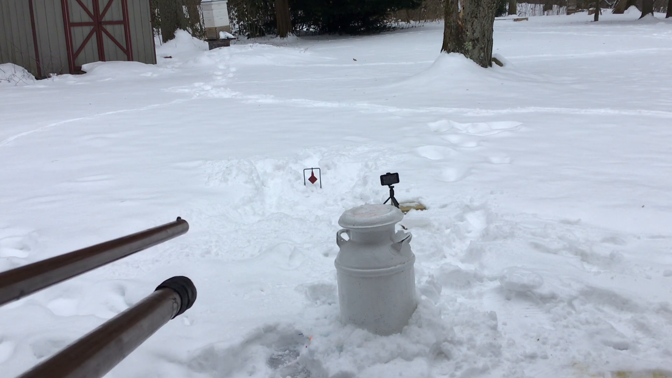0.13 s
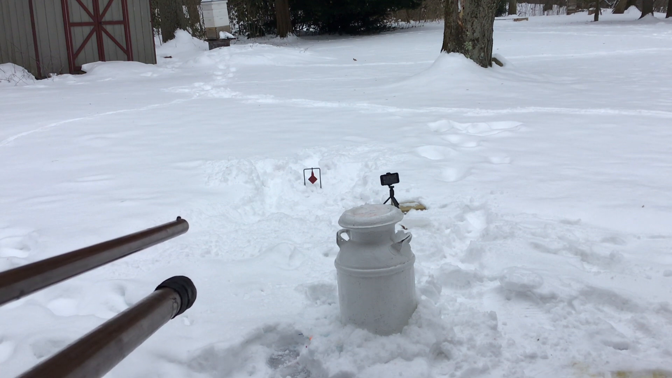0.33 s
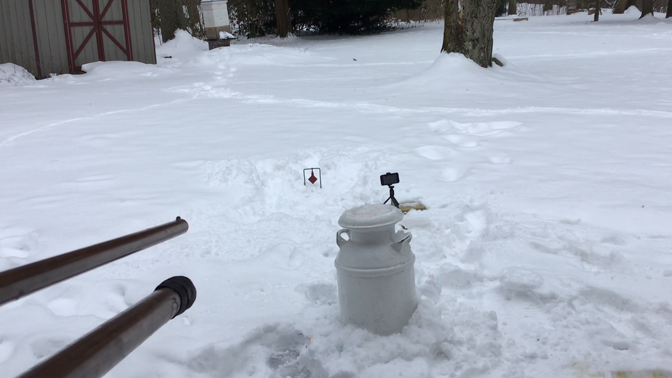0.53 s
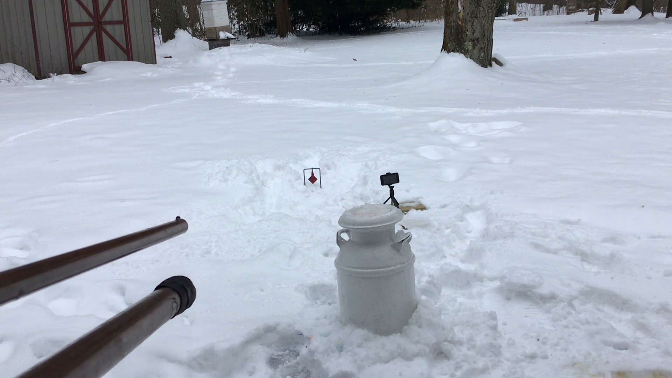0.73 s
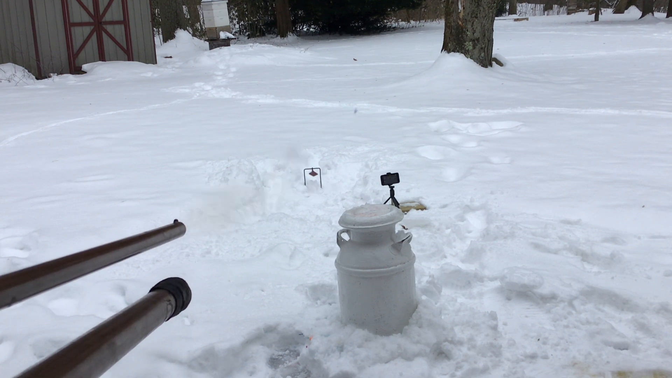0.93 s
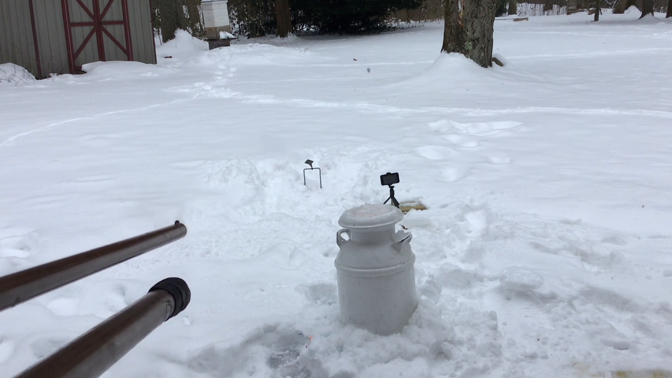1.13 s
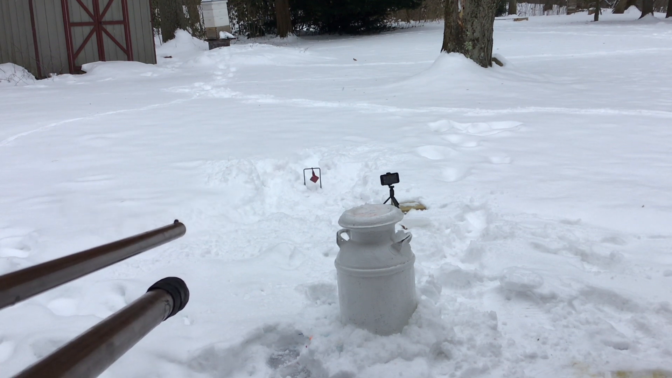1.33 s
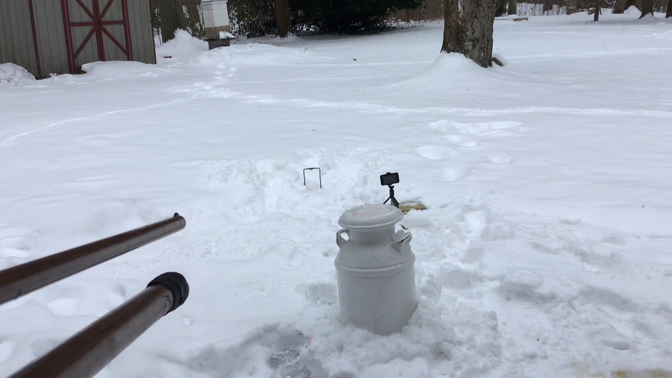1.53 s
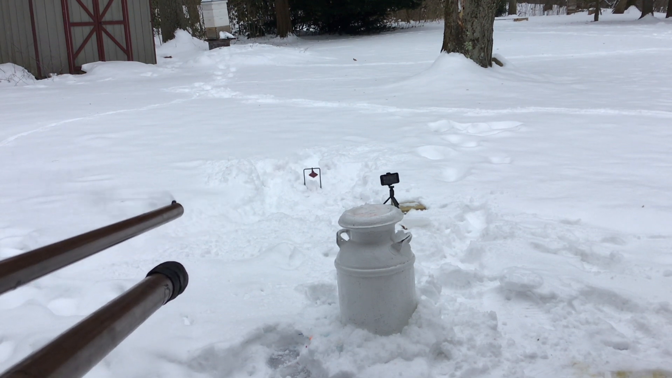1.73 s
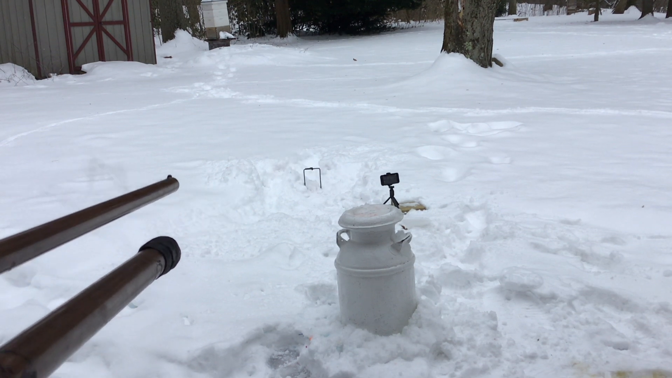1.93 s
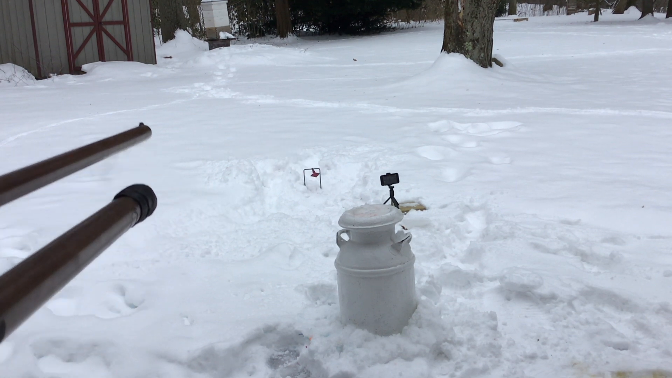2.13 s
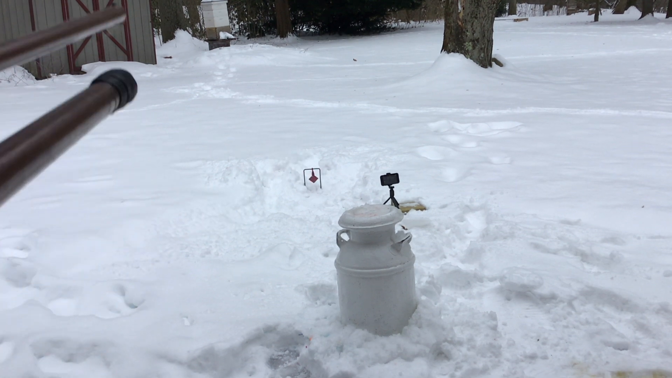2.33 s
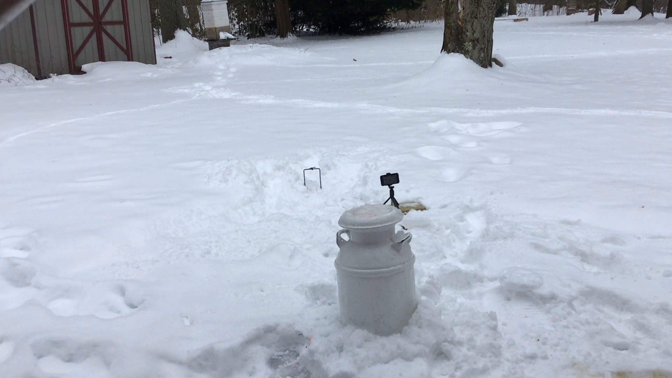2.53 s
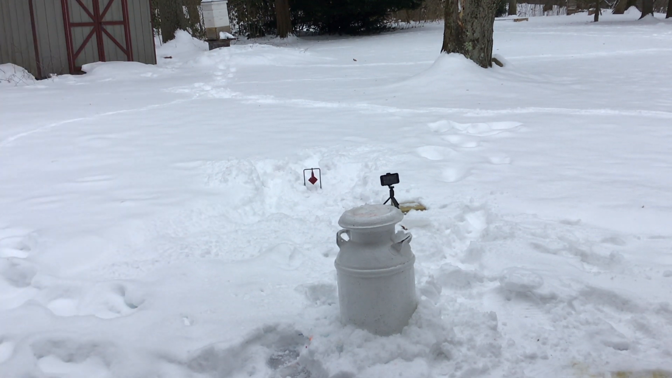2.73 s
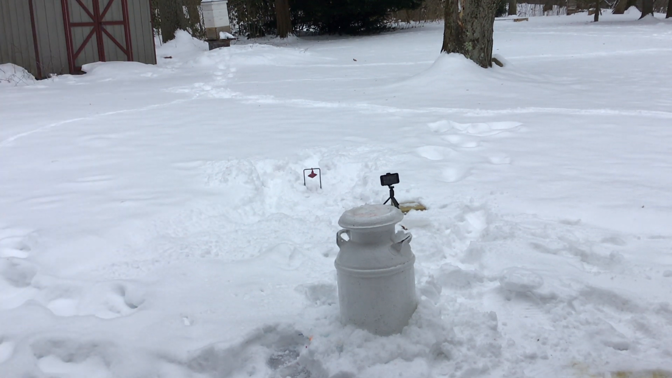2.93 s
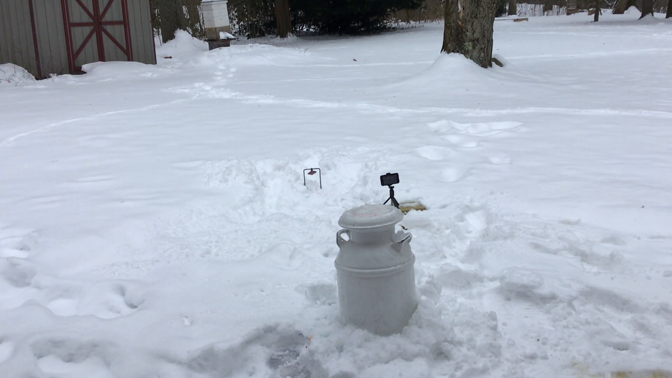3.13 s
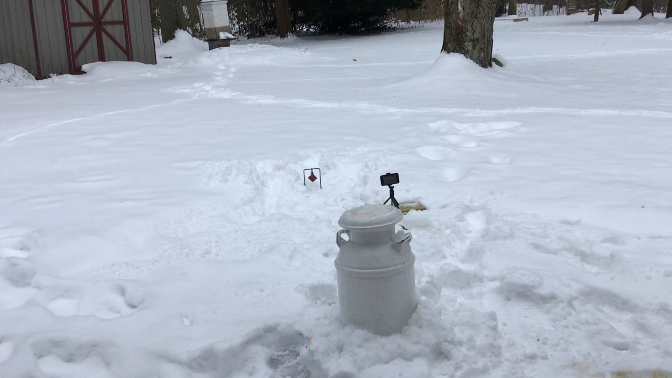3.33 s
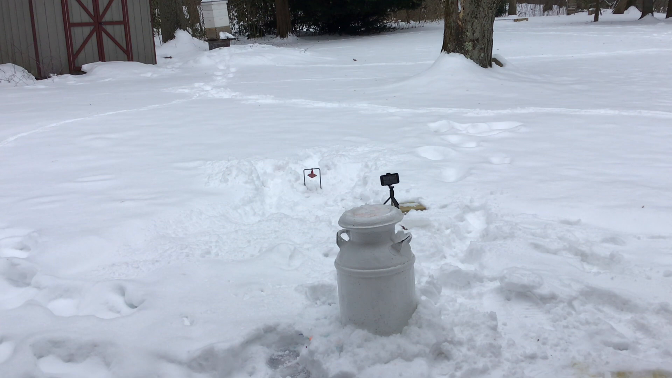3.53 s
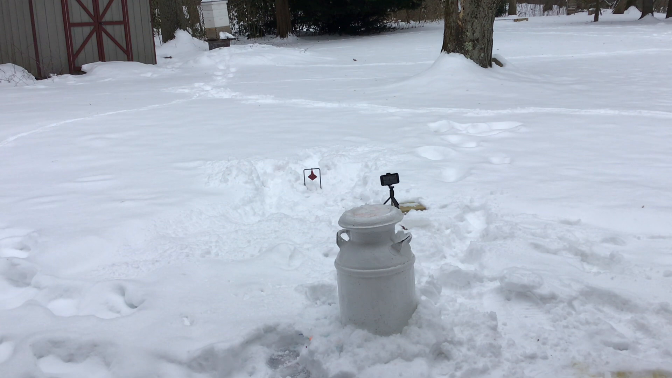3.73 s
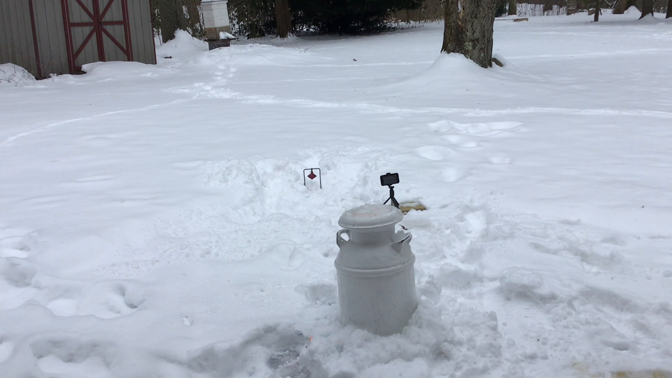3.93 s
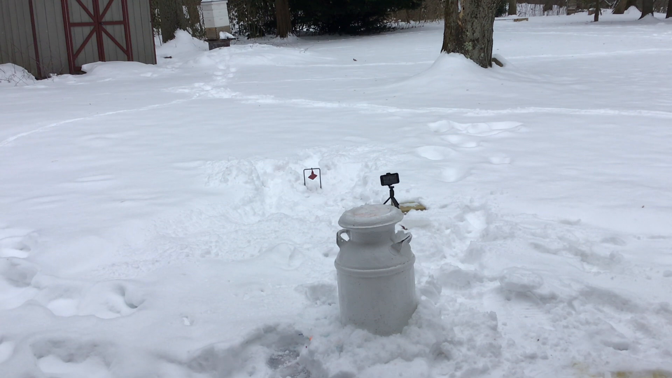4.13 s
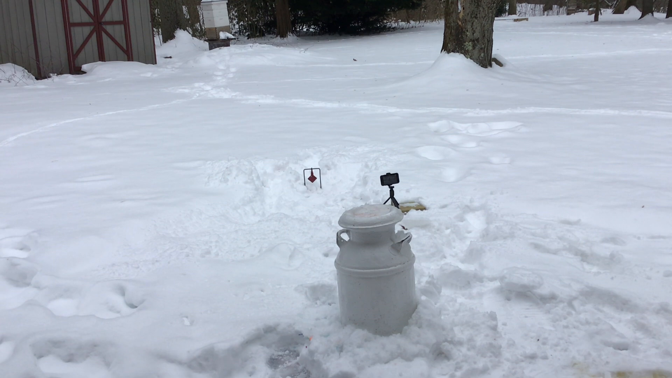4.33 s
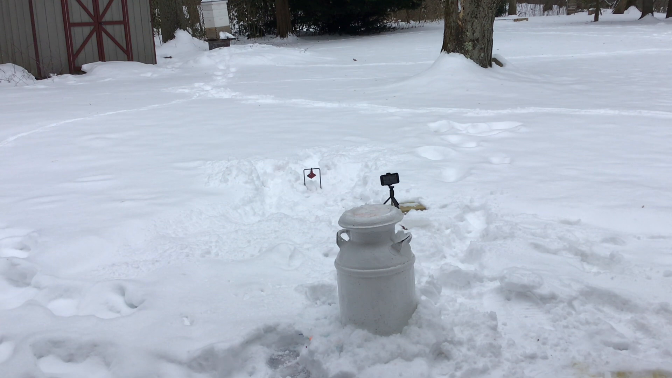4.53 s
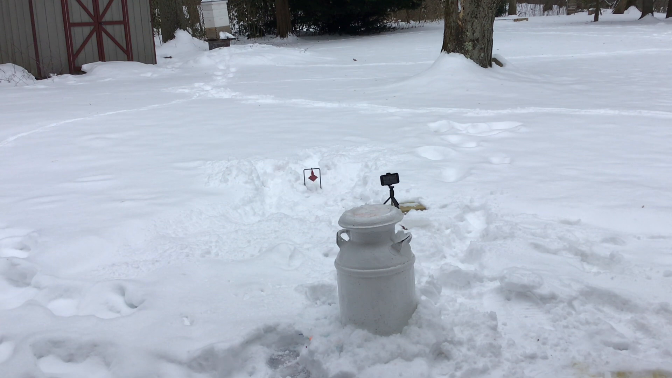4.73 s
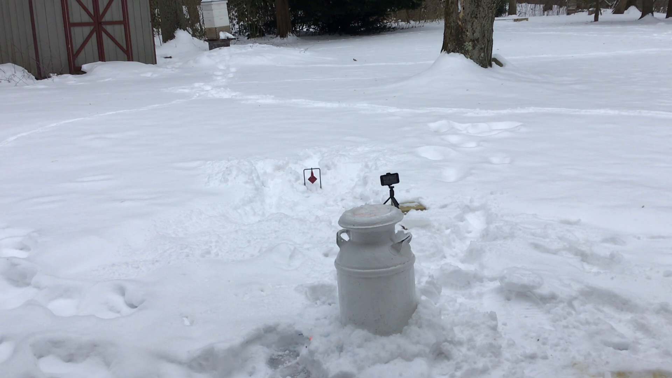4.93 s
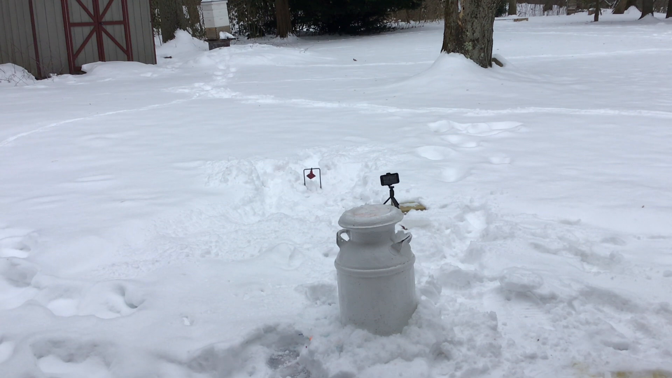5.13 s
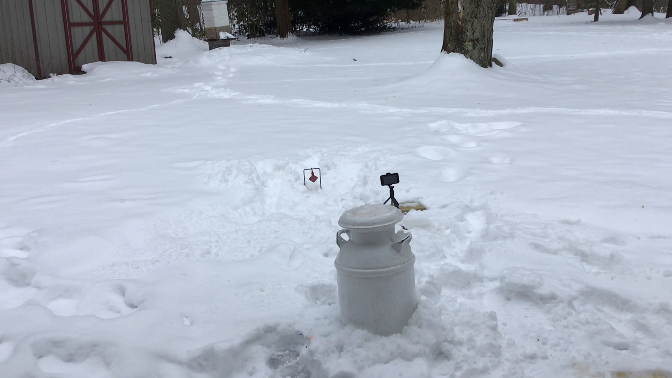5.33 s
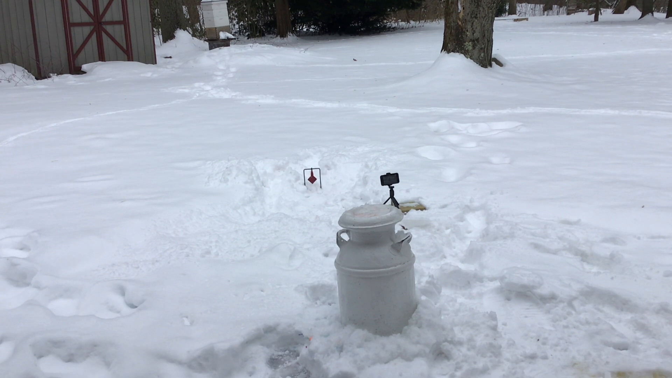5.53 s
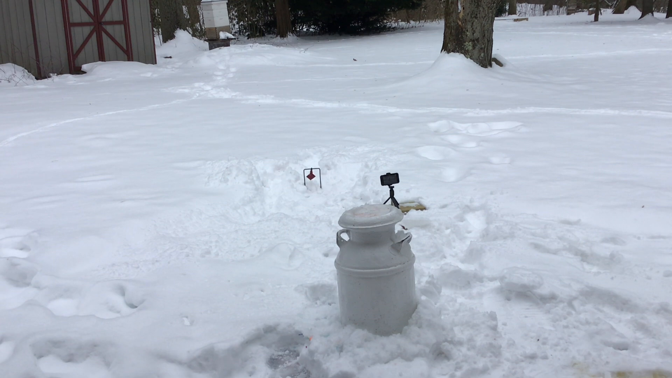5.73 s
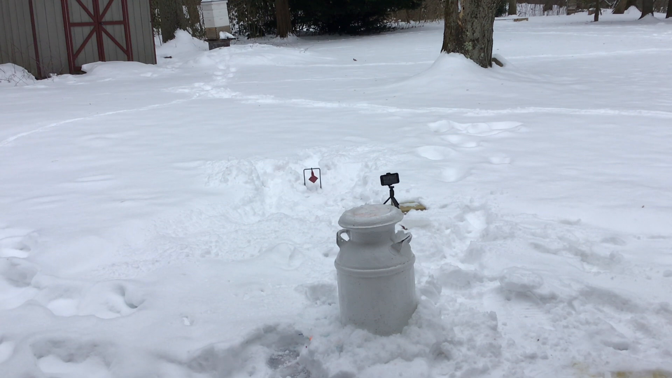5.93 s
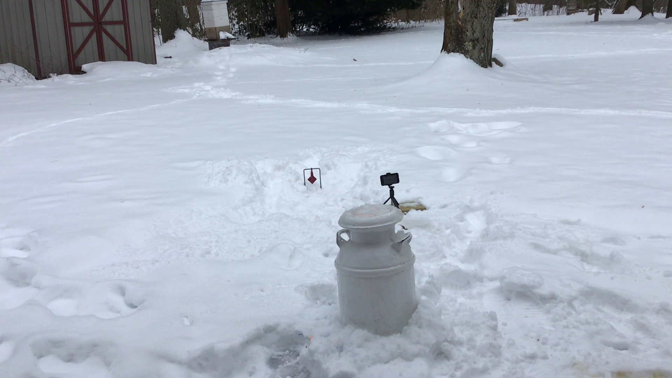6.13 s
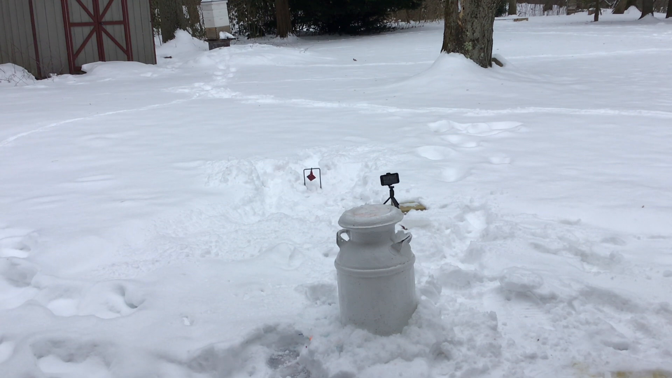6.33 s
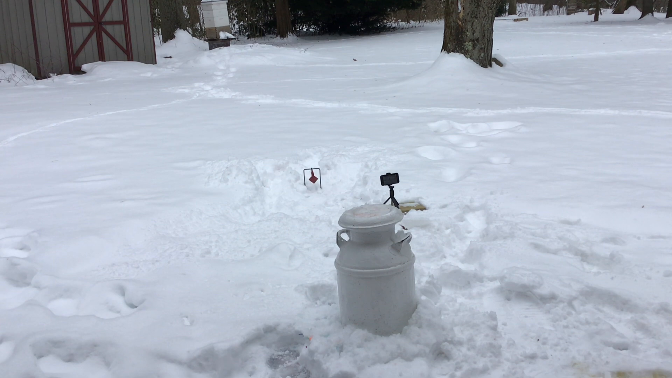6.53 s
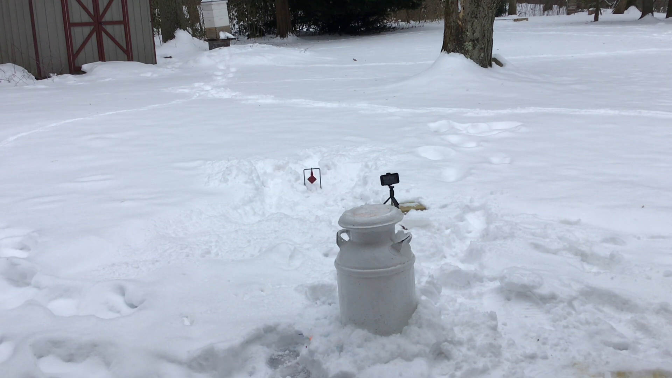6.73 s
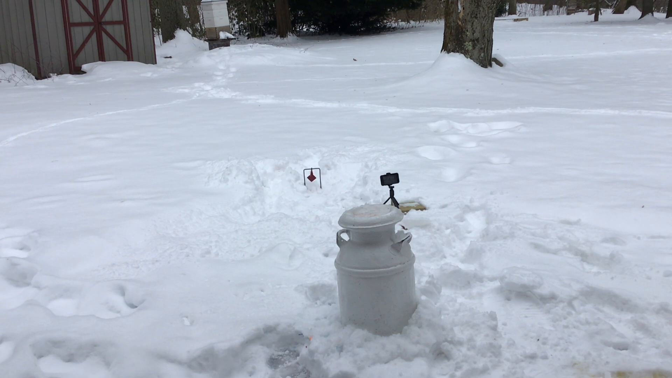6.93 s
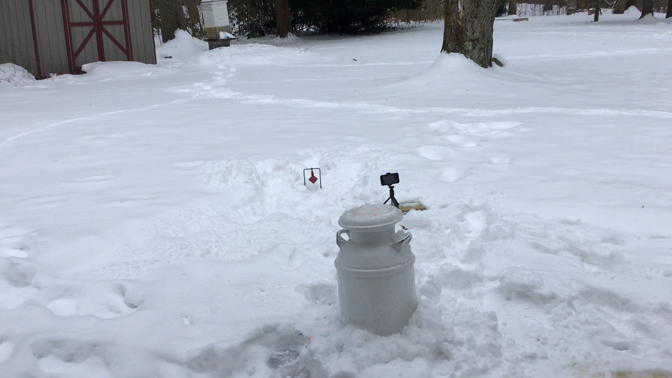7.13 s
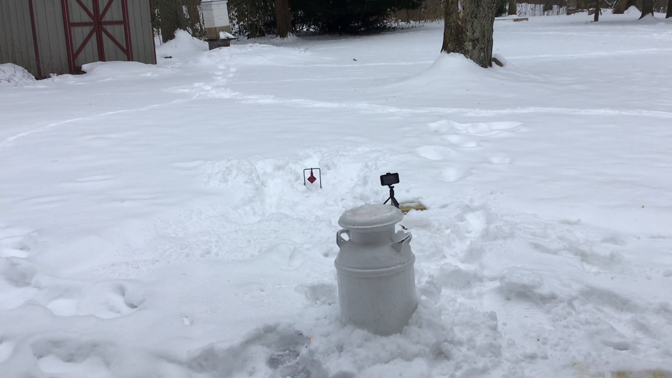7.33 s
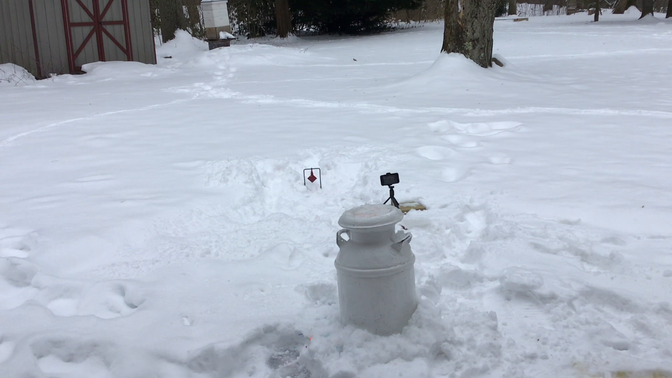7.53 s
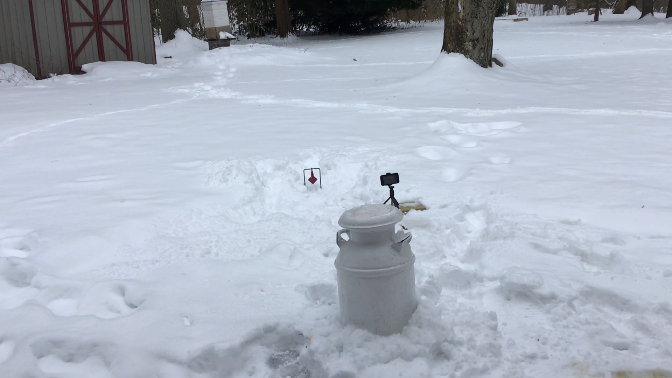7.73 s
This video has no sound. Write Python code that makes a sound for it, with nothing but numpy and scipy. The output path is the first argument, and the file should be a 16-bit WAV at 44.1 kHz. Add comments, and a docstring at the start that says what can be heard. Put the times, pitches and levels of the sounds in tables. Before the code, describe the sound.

A sudden close blast of air echoes outdoors with a faint metal ping, followed by a dull knock, sharp clicks and quiet birdsong.

```python
"""A snowy yard, phone microphone right beside a compressed-air launcher. Far traffic and wind on the
microphone run throughout; a small bird opens with faint, thin notes. The trigger clicks at 0.77 s, then
the valve lets go a short jet of air, a steel target rings, and walls, sheds and trees echo until 2.2 s.
From 1.6 s the launcher is handled close by, with clicks, knocks and a brushing sleeve, while birds in
the trees carry on with chips, buzzy notes and whistles."""
import sys
import numpy as np
from scipy import signal
from scipy.fft import rfft, irfft
from scipy.io import wavfile
from scipy.ndimage import uniform_filter1d

SR = 44100
rng = np.random.default_rng(int(sys.argv[2]) if len(sys.argv) > 2 else 0)


def wrap_up_sound(samples):
    """Save the sound to the file named by the first command line argument, as 16-bit audio."""
    columns = np.atleast_2d(samples).T
    # keep every value between -1 and 1, then stretch to whole-number steps
    tamed = np.clip(columns, -1, 1)
    steps = np.round(tamed * 32767).astype(np.int16)
    wavfile.write(sys.argv[1], SR, steps)


N = 342657

# air jet at the muzzle, beside the microphone: t/s, level/dB, tilt/(dB per octave)
JET_CURVE = [(.862, -58, -3.5), (.8735, -40.5, -3.5), (.875, -17, -1.5), (.882, -12, -2), (.894, -8, 1),
             (.917, -9.5, 1), (.937, -15, -1.5), (.945, -24, 0), (.96, -31, 2), (1.05, -46, -1),
             (1.2, -57.5, 0), (1.55, -91.5, -1)]
# its spectrum: f/Hz, density/dB
JET_SPECTRUM = [(24, -34), (40, -14), (70, -4.5), (320, -2), (479, -5), (556, -2.5), (790, -7),
                (1090, -7.5), (1180, -15), (1340, -8.5), (1590, -6), (6490, -9.5), (9220, -9.5),
                (16000, -14.5)]
# modes of valve and barrel: f/Hz, level/dB, t60/s
VALVE_MODES = [(65.6, -24, 0.2), (98, -20, 0.057), (130, -19, 0.08), (574, -19.5, 0.29), (1920, -13, .03),
               (2575, -11, .03), (3700, -10, 0.031), (7228, -13.5, 0.0042)]
# modes of the steel plate downrange: f/Hz, level/dB, t60/s
TARGET_MODES = [(5884, -2.5, 1.05), (6180, -13, .9), (6842, -13, .8), (7246, -8, .95), (7989, -10, .85),
                (8285, -1, .6), (9281, -11, .55), (10020, -11, .45)]
# echo off near walls, then sheds, then the tree line: t/s, level/dB, tilt/(dB per octave)
YARD_CURVE = [(.95, -33, 2), (1.0, -37, 3), (1.045, -48, 2.5), (1.08, -40, 2), (1.2, -45.5, 3.5),
              (1.23, -39.5, -0.5), (1.4, -43.5, -0.5), (1.75, -54, -3), (2.2, -71.5, 0)]
# its spectrum: f/Hz, density/dB
YARD_SPECTRUM = [(60, -26), (150, -23.5), (300, -1), (700, -0.5), (1800, -5.5), (3500, -11.5), (5500, -30),
                 (9000, -34.5), (16000, -51)]
# clearest slaps off walls and trunks: t/s, level/dB, f/Hz
WALL_SLAPS = [(0.956, -13, 680), (0.979, -14.5, 554), (1.077, -31, 2070), (1.097, -30, 1810),
              (1.101, -27.5, 600), (1.111, -26, 890), (1.131, -27, 2100), (1.217, -26, 446),
              (1.224, -26.5, 550), (1.241, -29, 503), (1.258, -30, 610), (1.284, -27.5, 708),
              (1.335, -29.5, 650), (1.38, -28.5, 1090), (1.467, -27.5, 670)]
# trigger and fittings, close: t/s, level/dB, f/Hz, second f/Hz, second level/dB, rattle level/dB
FITTING_CLICKS = [(0.7745, -46, 3200, 1800, -7, -9), (1.605, -57, 5000, 13030, 1, -4),
                  (1.636, -60.5, 11500, 12900, -1.5, -8), (2.2217, -51, 3000, 9000, -6, -6.5),
                  (2.3588, -52, 1400, 8200, -6, -0.5), (2.5215, -50, 2220, 4000, -10, -6.5),
                  (2.6102, -48.5, 2250, 4300, -5, -6), (2.658, -59, 2300, 4260, -4, -5),
                  (2.775, -59, 2390, 5000, -10, -8), (2.79, -61, 3970, 2500, -4, -8),
                  (3.022, -61.5, 4100, 2600, -9, -10), (5.349, -60, 2300, 4500, -8, -6),
                  (5.553, -29.5, 2750, 6640, -6.5, -14), (6.3098, -36, 2720, 7070, 0, -3.5),
                  (6.4817, -37.5, 1200, 6850, -9.5, -3.5), (6.528, -53, 2644, 6500, -14, -8),
                  (6.536, -55, 1470, 3970, -11, -3), (6.626, -54, 1360, 3980, -8, -2.5),
                  (7.6237, -57, 2240, 4300, -8, -10)]
# knocks on the launcher's pipe body: t/s, level/dB
BODY_KNOCKS = [(1.9369, -33), (1.9437, -42), (2.049, -54.5), (7.625, -54)]
# modes of that body: f/Hz, level/dB, t60/s
BODY_MODES = [(69.4, -10.5, 0.37), (131.4, -14, 0.19), (192, -3.5, 0.15), (293, 8.5, 0.054),
              (543, -1.5, 0.037), (785, 5.5, 0.017), (1490, -9, 0.025), (2520, -19, .012)]
# sleeve near the microphone: t/s, length/s, f/Hz, width/octaves, level/dB
SLEEVE_RUSTLES = [(1.8, 0.16, 7500, 0.18, -77), (1.738, 0.27, 12600, 0.52, -79.5),
                  (2.183, 0.16, 9000, 1, -79), (2.9, .07, 4870, 0.46, -80.5), (3.7, 0.35, 13600, 0.36, -84),
                  (6.92, .1, 13000, .3, -85.5), (7.2, .35, 13000, .2, -88)]
# runs of thin bird notes: t/s, held f/Hz, level/dB
THIN_NOTES = [(.045, 7940, -72), (.18, 7900, -77), (.32, 7800, -84), (.447, 7800, -84), (.58, 7700, -85),
              (5.938, 8250, -73), (6.078, 8050, -80), (6.22, 7980, -72), (6.345, 7850, -75),
              (6.475, 7700, -74), (6.61, 7800, -80), (6.87, 8100, -80), (7.22, 8400, -85)]
# arching notes: t/s, length/s, first f/Hz, held f/Hz, level/dB, upper f/Hz, upper level/dB
ARCHED_NOTES = [(3.395, 0.069, 7730, 8000, -77.5, 10000, -1), (3.518, .052, 6300, 7460, -71, 9300, -6),
                (5.426, 0.048, 6760, 8100, -75.5, 9500, -6), (5.523, 0.038, 5800, 7550, -69, 9300, -20),
                (7.33, .046, 6800, 7900, -80, 9700, -18), (7.418, .035, 6040, 7060, -78, 8900, -22),
                (7.51, .043, 6500, 7300, -83, 9000, -18), (7.61, 0.046, 6200, 7060, -78.5, 8800, -20)]
# whistles on one pitch: t/s, length/s, f/Hz, level/dB
FLAT_NOTES = [(3.525, .04, 5520, -77), (5.645, 0.047, 1910, -72.5), (5.866, 0.13, 2140, -85),
              (6.128, .09, 2140, -84)]
# harsh rising chips: t/s, last f/Hz, level/dB
RISING_CHIPS = [(1.678, 5950, -62.5), (1.767, 5630, -64), (1.85, 4700, -68), (3.616, 5880, -60),
                (3.70, 5500, -61.5)]
# buzzy notes: t/s, length/s, fundamental f/Hz, scoop depth/Hz, level/dB, upper harmonics' boost/dB
BUZZY_NOTES = [(2.25, .05, 380, 0, -84, 2), (2.33, .155, 383, 5, -86, 4), (2.58, .14, 379, 0, -86, 4),
               (3.79, .04, 410, 0, -72, -4), (3.84, .135, 388, 0, -75, -2), (4.055, .145, 385, 24, -73, 0),
               (4.285, .155, 388, 30, -73, -1), (4.52, .16, 382, 32, -79, -1),
               (4.76, .165, 387, 24, -79, 4), (5.0, .165, 388, 28, -76, -1), (5.26, .15, 388, 26, -75, 1),
               (5.605, .17, 376, -20, -78, 3), (5.85, .085, 400, 40, -79, 0), (5.965, .045, 390, 6, -83, 3),
               (6.065, .165, 392, 42, -81, 1), (7.70, .07, 395, 30, -80, 0)]
# their harmonics: number, level/dB
BUZZ_HARMONICS = [(7, -19), (8, -11), (9, 0), (10, 0), (11, -11), (12, -19), (13, -20), (14, -22)]
# gusts on the microphone: t/s, length/s, level/dB
MIC_GUSTS = [(.3, 0.32, -65), (1.14, 0.093, -53), (2.154, 0.089, -65), (2.45, 0.11, -66),
             (2.78, 0.082, -62), (3.05, 0.064, -62), (3.715, 0.12, -49.5), (3.84, 0.13, -57),
             (4.374, 0.084, -58), (4.496, 0.042, -48), (4.619, 0.13, -52.5), (6.522, 0.2, -63)]
# far traffic: f/Hz, density/dB
TRAFFIC_SPECTRUM = [(59, -31), (100, -2.5), (202, -0.5), (315, -4), (442, -11.5), (676, -7.5), (910, -15.5),
                    (1280, -24.5), (1520, -24), (1760, -27.5), (4020, -35.5), (13800, -47), (16000, -57)]
# half-octave noise bands: f/Hz
BAND_CENTRES = 40 * 2 ** np.arange(0, 8.8, .5)


def air_jet():
    """Compressed air rushes from the muzzle, with one very brief rising whistle."""
    out = rush(JET_CURVE, JET_SPECTRUM, pivot_hz=3100, flicker_db=1.8, flicker_hz=400)
    centre_s, width_s, rise_hz_per_s = .914, .004, 240000
    t = clock(6 * width_s) - 3 * width_s
    bell = np.exp(-.5 * (t / width_s) ** 2)
    add(out, centre_s + t[0], undb(-9) * bell * glide(9250 + rise_hz_per_s * t))
    return out


def valve():
    """Valve and barrel ring as the air is let go."""
    out = np.zeros(N)
    add(out, .879, struck(clock(.3), VALVE_MODES))
    return out


def steel_target(hit_s=.89, level_db=-37):
    """Each mode of the struck plate is a close pair that beats, and flickers as the plate spins."""
    out, t = np.zeros(N), clock(1.2)
    for hz, db, t60 in TARGET_MODES:
        pair = ring(t, hz, t60) + .45 * ring(t, hz + rng.uniform(9.6, 38), t60)
        flicker_db = 2.2 * walk(len(t), 70)
        add(out, hit_s, undb(level_db + db + flicker_db) * pair * attack(t, .024))
    return out


def yard_echo(weak_count=14):
    """The yard returns the shot as a wash, with clear slaps and weaker ones scattered at random."""
    out = rush(YARD_CURVE, YARD_SPECTRUM, pivot_hz=550, flicker_db=1.6, flicker_hz=260)
    late_s = rng.uniform(0, .47, size=weak_count)
    spread_db, pitch = rng.standard_normal((weak_count, 2)).T
    weak_slaps = zip(1.06 + late_s, -32.5 - 11 * late_s + spread_db, 670 * 2 ** (.23 * pitch))
    t = clock(.03)
    for s, db, hz in WALL_SLAPS + list(weak_slaps):
        crack = .64 * band(len(t), 1800, .49) * decay(t, .0075)
        add(out, s, undb(db) * attack(t, .00097) * (ring(t, hz, .02) + crack))
    return out


def clicks(ring_cycles=24):
    """Trigger and fittings strike: two short rings, a rattle and a snap that grows with harder hits."""
    out, t = np.zeros(N), clock(.033)
    for s, db, hz, second_hz, second_db, rattle_db in FITTING_CLICKS:
        main = ring(t, hz, ring_cycles / hz)
        second = undb(second_db) * ring(t, second_hz, 2 * ring_cycles / second_hz)
        rattle = undb(rattle_db) * band(len(t), .45 * np.sqrt(hz * second_hz), 1) * decay(t, .025)
        snap = undb(-3 + 1.7 * db) * band(len(t), 4800, 1.7) * decay(t, .0042)
        add(out, s, undb(db) * (main + second + rattle + snap) * attack(t, .000092))
    return out


def knocks():
    """Handling bumps the pipe body, which rings dully."""
    out, t = np.zeros(N), clock(.4)
    body = struck(t, BODY_MODES) * attack(t, .00046)
    for s, db in BODY_KNOCKS:
        add(out, s, undb(db) * body)
    return out


def sleeve():
    """Cloth brushes close by in soft swells of high noise."""
    out = np.zeros(N)
    for s, length, hz, octaves, db in SLEEVE_RUSTLES:
        u = progress(length)
        envelope = undb(db + 1.9 * walk(len(u), 150)) * np.sin(np.pi * u) ** .65
        add(out, s, envelope * band(len(u), hz, octaves))
    return out


def whistle(length, first_hz, held_hz, scoop=.3, drop=.68):
    """A bird's wobbling sine scoops to held_hz, then ends at drop times that; falling, it gets rougher."""
    u = progress(length)
    fall = np.clip((u - .88) / .12, 0, 1)
    hz = held_hz + (first_hz - held_hz) * np.exp(-u / scoop) + (drop - 1) * held_hz * fall
    envelope = np.sin(np.pi * u ** 1.5) ** .25 * undb(2 * walk(len(u), 127))
    wobble_hz = 40 * (1 + 9 * fall * (drop < 1)) * walk(len(u), 630)
    return envelope * glide(hz + wobble_hz)


def bird_whistles():
    """Small birds sing thin and arching notes in two voices, and flat notes in one."""
    out = np.zeros(N)
    for s, hz, db in THIN_NOTES:
        for ratio, voice_db in [(1, 0), (1.25, -17)]:
            add(out, s, undb(db + voice_db) * whistle(.066, ratio * (hz - 600), ratio * hz, scoop=.06))
    for s, length, first_hz, held_hz, db, upper_hz, upper_db in ARCHED_NOTES:
        add(out, s, undb(db) * whistle(length, first_hz, held_hz))
        add(out, s, undb(db + upper_db) * whistle(length, upper_hz - 1100, upper_hz))
    for s, length, hz, db in FLAT_NOTES:
        add(out, s, undb(db) * whistle(length, hz, hz, drop=1))
    return out


def bird_chips(first_hz=4400, rasp_hz=600):
    """Short upward sweeps, made harsh by a fast pitch wobble."""
    out, u = np.zeros(N), progress(.051)
    for s, last_hz, db in RISING_CHIPS:
        hz = first_hz + (last_hz - first_hz) * u + rasp_hz * np.tanh(walk(len(u), 1200))
        add(out, s, undb(db) * np.sin(np.pi * u ** 1.5) * glide(hz))
    return out


def bird_buzzes(scoop_s=.028, sag_hz=14):
    """A stack of close harmonics slides onto its pitch and sags, roughened by noise."""
    out = np.zeros(N)
    for s, length, held_hz, scoop_hz, db, upper_db in BUZZY_NOTES:
        u = progress(length)
        hz = held_hz - scoop_hz * np.exp(-u * length / scoop_s) - sag_hz * u ** 3
        hz *= 1 + .006 * walk(len(u), 118)
        stack = sum(undb(harmonic_db + upper_db * (k > 9) + 2.8 * walk(len(u), 90)) * glide(k * hz)
                    for k, harmonic_db in BUZZ_HARMONICS)
        roughness = 1 + .41 * band(len(u), 482, 1)
        add(out, s, undb(db) * np.sin(np.pi * u ** 1.3) ** .22 * stack * roughness)
    return out


def tree_echo(song, level_db=-36):
    """Birdsong reaches the microphone with a faint tail scattered off the trees."""
    t = clock(.25)
    tail = rng.standard_normal(len(t)) * decay(t, .24)
    return song + undb(level_db) * signal.fftconvolve(song, tail)[:N]


def wind(steady_db=-63.5):
    """Wind buffets the microphone in the bass, with short gusts on top."""
    force = np.full(N, undb(steady_db))
    for s, length, db in MIC_GUSTS:
        add(force, s, undb(db) * np.sin(np.pi * progress(length)))
    rumble = sum(undb(db + 2 * walk(N, 14)) * band(N, hz, .36)
                 for hz, db in [(30, -14), (58, -3), (105, -7)])
    return force * rumble


def far_traffic(level_db=-60):
    """Distant traffic murmurs in flickering bands that slowly swell together."""
    swell_db = .8 * walk(N, .83)
    murmur = sum(undb(band_level(TRAFFIC_SPECTRUM, hz) + swell_db + 1.5 * walk(N, 8)) * band(N, hz, .29)
                 for hz in BAND_CENTRES[4:])
    return undb(level_db) * murmur / murmur.std()


def rush(curve, spectrum, pivot_hz, flicker_db, flicker_hz):
    """Fluttering noise whose level and tilt follow a curve; air takes the treble as the path grows."""
    times, level_db, tilt_db = np.transpose(curve)
    start = times[0]
    t = start + clock(times[-1] - start)
    level_db, tilt_db = np.interp(t, times, level_db), np.interp(t, times, tilt_db)
    bands_db = band_level(spectrum, BAND_CENTRES)
    bands_db -= 10 * np.log10(np.sum(undb(2 * bands_db)))  # band powers sum to 1
    puffs_db = flicker_db * walk(len(t), flicker_hz)
    out = np.zeros(N)
    for hz, db in zip(BAND_CENTRES, bands_db):
        slope_db = tilt_db * np.log2(max(hz, 250) / pivot_hz)
        air_loss_db = (t - start) * hz / 1000  # 1 dB per second and kHz
        flutter_db = puffs_db + 1.5 * walk(len(t), flicker_hz / 3)
        gain = undb(level_db + db + slope_db - air_loss_db + flutter_db)
        add(out, start, gain * band(len(t), hz, .41))
    return out


def undb(db):
    """dB to gain."""
    return 10 ** (np.asarray(db) / 20)


def clock(length):
    """Sample times from 0 to length s."""
    return np.arange(int(length * SR)) / SR


def progress(length):
    """Ramp from 0 to 1 over length s."""
    return clock(length) / length


def add(out, s, x):
    """Mix x into out from second s."""
    i = int(s * SR)
    out[i:i + len(x)] += x[:len(out) - i]


def band(size, hz, octaves):
    """Noise of rms 1 in a bell-shaped band."""
    f = np.fft.rfftfreq(size, 1 / SR) + 1
    bell = np.exp(-.5 * (np.log2(f / hz) / octaves) ** 2)
    x = irfft(rfft(rng.standard_normal(size)) * bell, size)
    return x / x.std()


def band_level(spectrum, hz):
    """Relative level in dB of a half-octave band of a density spectrum."""
    f, db = np.transpose(spectrum)
    return np.interp(np.log(hz), np.log(f), db) + 10 * np.log10(hz)


def walk(size, rate):
    """Random values held 1 / rate s and smoothed twice."""
    hold = int(SR / rate)
    steps = np.repeat(rng.standard_normal(size // hold + 1), hold)
    return 1.5 * uniform_filter1d(uniform_filter1d(steps, hold), hold)[:size]


def attack(t, rise_s):
    """Linear rise to 1."""
    return np.minimum(t / rise_s, 1)


def decay(t, t60):
    """Fall of 60 dB every t60 s."""
    return 1000. ** (-t / t60)


def ring(t, hz, t60):
    """One struck mode."""
    return np.sin(2 * np.pi * hz * t) * decay(t, t60)


def struck(t, modes):
    """A table of modes ringing together."""
    return sum(undb(db) * ring(t, hz, t60) for hz, db, t60 in modes)


def glide(hz):
    """Sine on a moving pitch."""
    return np.sin(2 * np.pi * np.cumsum(hz) / SR)


def scene():
    """The yard in mono, heard from beside the launcher."""
    background = far_traffic() + wind()
    shot = air_jet() + valve() + yard_echo() + steel_target()
    handling = clicks() + knocks() + sleeve()
    birds = tree_echo(bird_whistles() + bird_chips() + bird_buzzes())
    return (shot + handling + birds + background)[None]


def record(dry, low_hz=47.7, top_hz=15750):
    """The phone drops the deepest bass, rounds the loudest peaks and cuts the top."""
    lean = signal.sosfilt(signal.butter(4, low_hz, "high", fs=SR, output="sos"), dry)
    rounded = np.tanh(1.12 * lean) / 1.086
    return signal.sosfilt(signal.ellip(10, .2, 60, top_hz, fs=SR, output="sos"), rounded)


dry = scene()
out = record(dry)
wrap_up_sound(out)
```